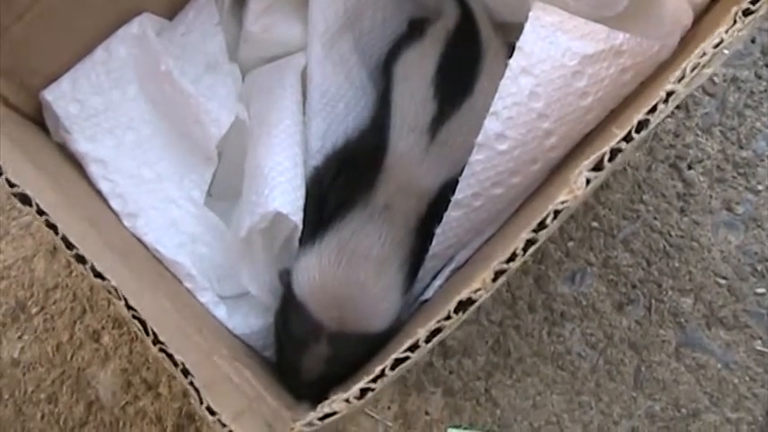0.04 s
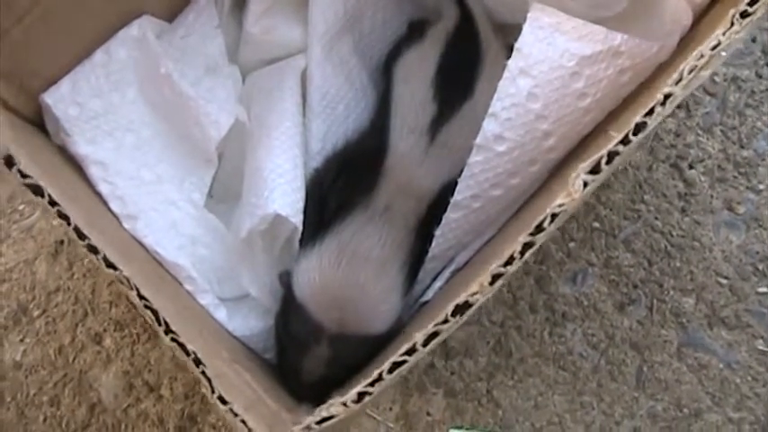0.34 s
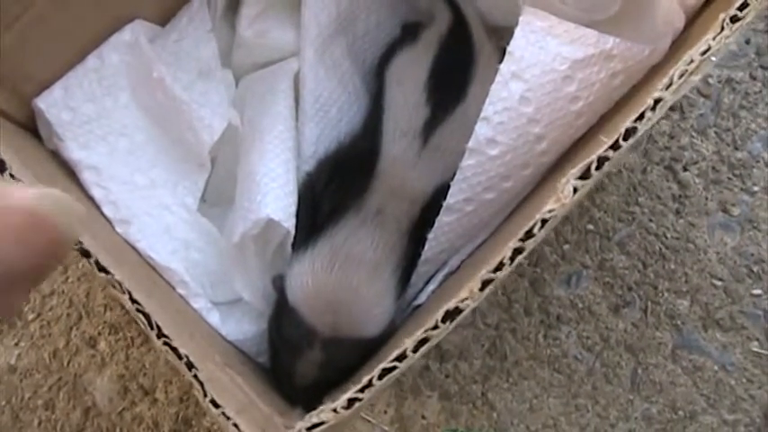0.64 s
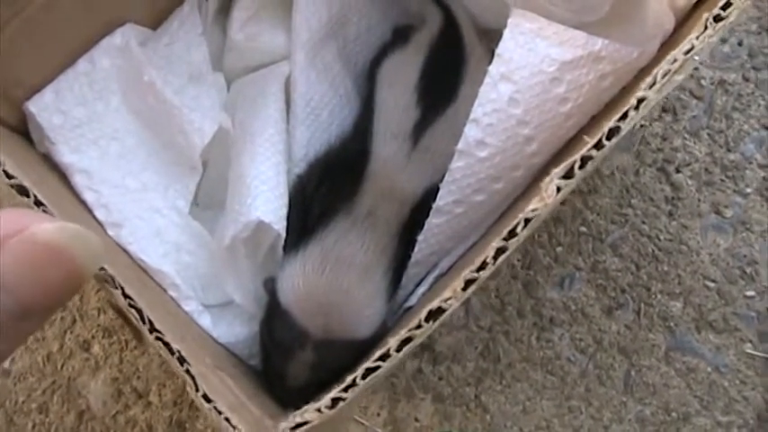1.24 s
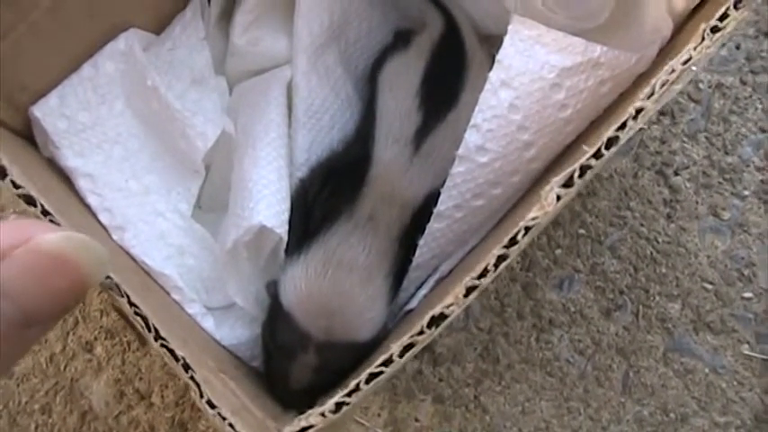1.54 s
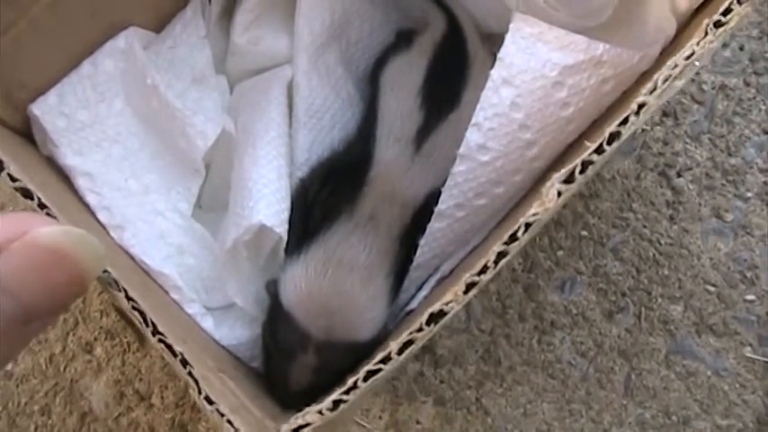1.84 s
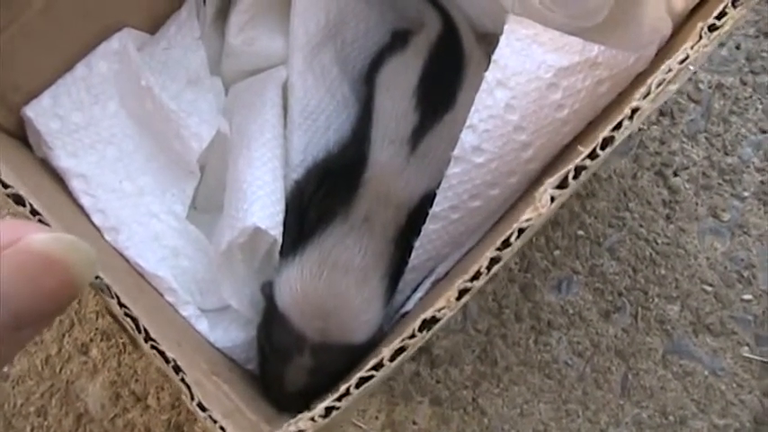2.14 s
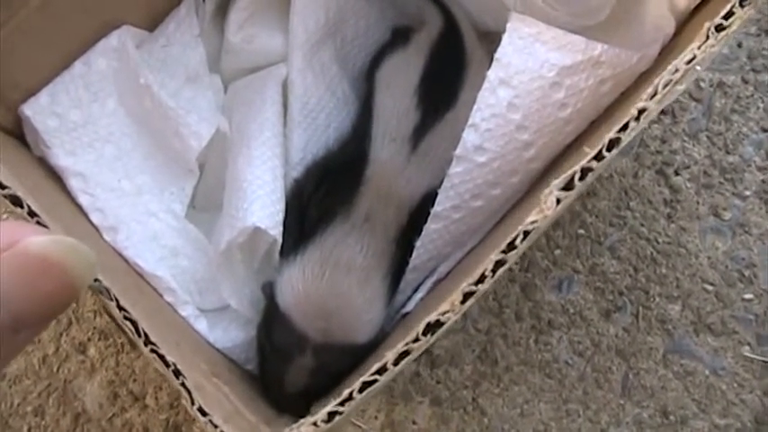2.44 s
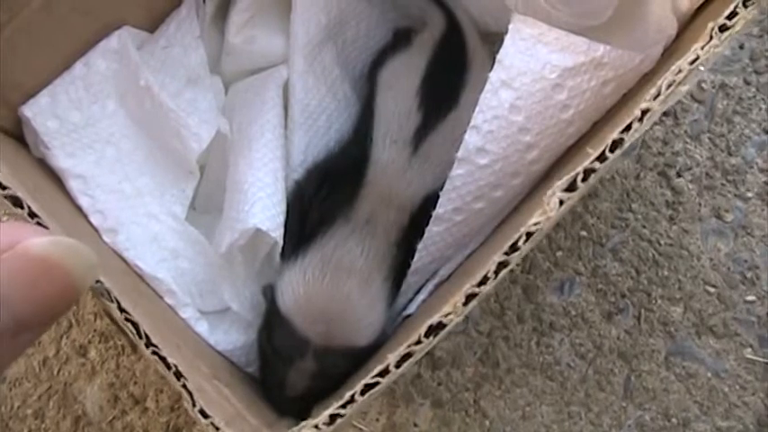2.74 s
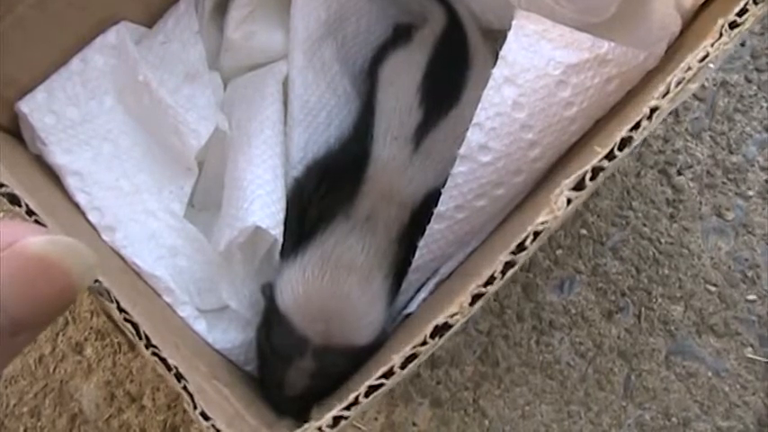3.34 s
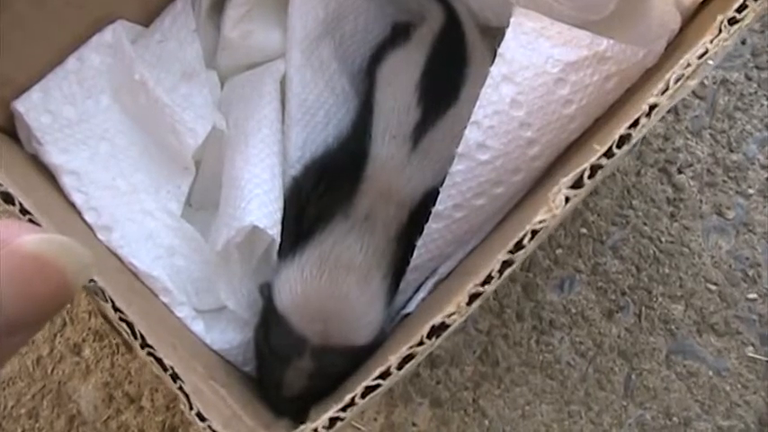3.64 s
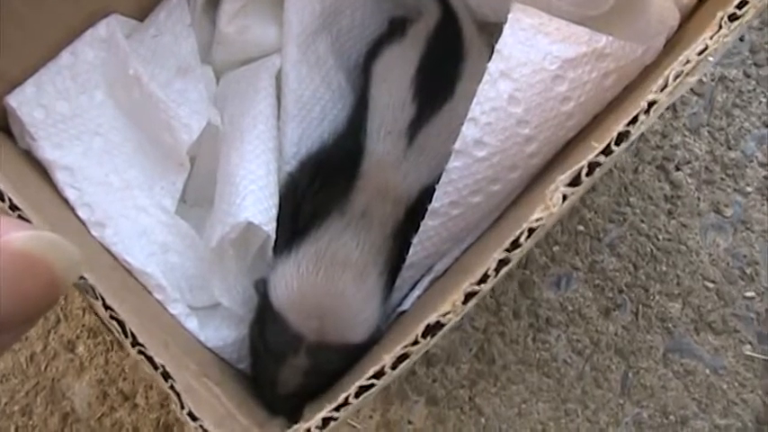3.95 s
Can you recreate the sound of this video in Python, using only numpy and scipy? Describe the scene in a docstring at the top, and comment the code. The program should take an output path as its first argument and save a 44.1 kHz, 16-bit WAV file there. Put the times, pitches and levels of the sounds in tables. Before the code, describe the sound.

A baby skunk chatters twice close to the microphone, rapid clicks swooping into squeaks, the second call ending in a rising squeal. Beforehand a hand softly rubs its cardboard box. Faint high chirps and a machine hum lie behind.

```python
"""A paper-lined cardboard box, microphone close: a hand rubs along it, then a baby skunk inside gives two
chattering calls. Its voice, pulses ringing the throat, swoops about 30 times a second from separate clicks
up to a squeak, and the second call ends in a rising squeal. The cardboard ticks and crunches as it gives.
Some way off something small chirps faintly, very high, and a machine hums in the background."""
import sys
import numpy as np
from scipy import signal
from scipy.fft import rfft, irfft
from scipy.io import wavfile
from scipy.ndimage import uniform_filter1d

SR = 44100
rng = np.random.default_rng(int(sys.argv[2]) if len(sys.argv) > 2 else 0)


def materialize(psi):
    """Save the field psi as 16-bit PCM at rate SR to the path in sys.argv[1].

    A 1-D psi becomes a single channel; in a 2-D psi each row is a channel.
    """
    bounded = np.clip(np.atleast_2d(psi).T, -1, 1)
    quanta = np.round(bounded * 32767).astype(np.int16)
    wavfile.write(sys.argv[1], SR, quanta)


N = 176400


def skunk(first_call_s=1.742, second_call_s=2.849):
    """Close up, vocal pulses and rasp ring the throat: an uneven growl when slow, smooth when fast."""
    # treble lift of the rasp (frequency [Hz], gain [dB])
    rasp_tilt = [(1200, -6), (4500, 11)]
    voice_db, rasp_db, pulse_db_per_octave = -23.5, -29.5, 2.5
    growl_hz, growl_fade_s, growl_start_db, growl_end_db = 947, 0.12, -3, -6.5
    jitter, shimmer_db, rough_growth = .0035, .9, 8
    t = clock()
    pitch, db = voice_contour()
    growl = 1 / (1 + (pitch / growl_hz) ** 4)
    age = t - np.where(t < second_call_s - .5, first_call_s, second_call_s)
    pitch = pitch * (age > 0)
    fresh = np.exp(-(age / growl_fade_s) ** 4)  # the low growl weakens into each call
    db = db + growl * (growl_end_db + (growl_start_db - growl_end_db) * fresh)
    rough = 1 + rough_growth * (2 * growl + .5 * fresh)
    cycles = np.cumsum(pitch * np.exp(jitter * rough * walk(940))) / SR
    times = np.interp(np.arange(1, int(cycles[-1])), cycles, t)  # one pulse a cycle
    octaves = np.log2(np.maximum(pitch, growl_hz / 2) / growl_hz)
    shimmer = shimmer_db * np.sqrt(rough) * walk(550)
    size = undb(voice_db + db + pulse_db_per_octave * octaves + shimmer)
    folds = pulses(times, np.interp(times, t, size))
    rasp_size = undb(rasp_db) * size * np.sqrt(pitch / SR) * (rough + 1)
    rasp = colour(rasp_size * rng.standard_normal(N), rasp_tilt)
    return throat(folds, rasp, growl * fresh, pitch) + voice_clicks()


def voice_contour(creak_hz=327.3, creak_reach=1.7, top_flatness=2.3):
    """Pitch and level: each swoop arches out of a slow creak, and a squeal closes the second call."""
    # swoops of the voice (time of top [s], top pitch [Hz], rise [s], fall [s], relative level [dB])
    swoops = [(1.7548, 1578, 0.0085, 0.0068, -4.5), (1.785, 1252, 0.007, 0.0074, -5.5),
              (1.816, 1637, 0.0084, 0.0075, -5), (1.847, 1589, .011, .016, -3.5),
              (1.876, 1790, .029, 0.02, -4), (1.908, 1732, 0.017, 0.012, -3.5),
              (1.941, 1681, 0.022, .012, -5.5), (1.975, 1620, 0.016, 0.01, -3),
              (2.005, 1554, 0.030, 0.012, -5.5), (2.043, 1362, 0.022, 0.011, -6.5),
              (2.852, 2080, .006, 0.0087, -2), (2.8815, 1875, 0.010, 0.0091, -3),
              (2.912, 1694, .008, .010, -4.5), (2.943, 1600, .013, 0.015, -5),
              (2.957, 789, .012, .012, -0.5), (2.977, 1828, .021, 0.018, -3.5),
              (3.008, 2007, 0.016, 0.021, -2), (3.037, 2048, 0.03, 0.014, -1.5),
              (3.068, 1779, .022, .016, -2.5)]
    # closing squeal (time [s], pitch [Hz], relative level [dB])
    squeal_path = [(3.084, 499, -2), (3.093, 1433, -2.5), (3.100, 1683, -5), (3.110, 1910, -0.5),
                   (3.124, 2140, 1), (3.137, 2260, -2.5), (3.148, 2310, 0.5), (3.162, 2330, -12)]
    t, arches = clock(), []
    for at, hz, rise, fall, _ in swoops:
        away = np.abs(t - at) / np.where(t < at, rise, fall)
        arches.append(np.maximum(hz * (1 - away ** top_flatness), creak_hz * (away < creak_reach)))
    weight = np.array(arches) ** 6  # soft maximum: overlapping swoops merge
    pitch = weight.sum(axis=0) ** (1 / 6)
    db = np.array(swoops)[:, 4] @ weight / (weight.sum(axis=0) + 1)
    at, hz, squeal_db = np.array(squeal_path).T
    squeal = np.interp(t, at, hz, left=0, right=0)
    return np.maximum(pitch, squeal), np.where(squeal > pitch, np.interp(t, at, squeal_db), db)


def throat(folds, rasp, growl, pitch, pure_hz=2200, grunt_hz=760, grunt_q=4, grunt_db=12):
    """Throat and mouth resonate; slow pulses add a grunt, the fastest round off towards a pure tone."""
    # resonances of throat and mouth (frequency [Hz], gain [dB])
    resonances = [(250, -19), (520, 10), (760, 11.5), (1020, 1.5), (1450, 4), (1750, -5.5), (2100, 1),
                  (2500, -4), (3000, -4), (3550, -13), (4100, -5), (5000, -20.5), (6500, -16), (8200, -19),
                  (9600, -31), (15500, -48)]
    pure = 1 / (1 + (pure_hz / np.maximum(pitch, 1)) ** 20)
    rounded = signal.lfilter(*signal.butter(2, 2.76 * pure_hz, fs=SR), pure * folds)
    grunt = signal.lfilter(*signal.iirpeak(grunt_hz, grunt_q, fs=SR), growl * folds)
    return colour((1 - pure) * folds + rounded + rasp, resonances) + undb(grunt_db) * grunt


def voice_clicks(gain_db=-23.5, rebound_s=.00055, rebound_share=.6):
    """The voice catches as some swoops start: a hard click and a weaker, opposite rebound."""
    # catches of the voice (time [s], relative level [dB])
    catches = [(1.7425, -1), (1.771, -5), (1.7763, -1.5), (1.8035, 0.5), (1.8095, -7), (1.836, -1.5),
               (1.959, -9), (2.8493, 0.5), (2.8672, 0.5), (2.9026, 2), (2.9309, 1), (2.9333, -2)]
    # colour of a click (frequency [Hz], gain [dB])
    click_colour = [(200, -29), (650, 20), (1300, -19), (3000, 1.5), (5000, -5.5), (7500, -1.5),
                    (11000, -19), (15500, -24)]
    at, db = np.array(catches).T
    snap = undb(gain_db + db)
    return colour(pulses(at + rebound_s, rebound_share * snap) - pulses(at, snap), click_colour)


def squeal_tail(at=3.21, width=0.073, db=-66, band_hz=(2300, 5500)):
    """As the squeal ends it splits into thin whistles and trails off in an airy hiss."""
    # whistles (time of peak [s], width [s], pitch [Hz], glide [Hz/s], level [dB])
    whistles = [(3.150, 0.013, 5380, 9000, -62), (3.168, .015, 3980, 29700, -59)]
    band = signal.butter(4, band_hz, "bandpass", fs=SR, output="sos")
    air = unit(signal.sosfilt(band, rng.standard_normal(N)))
    return sum(squeak(*row) for row in whistles) + undb(db) * swell(at, width) * air


def rubbing(side_db=-2, grain_db=1.8, paper_t60_s=.06, paper_hz=11900, paper_q=25):
    """Skin slides on cardboard near the microphone: fine hiss and a papery ring over the hollow box."""
    # strokes of the hand (time of peak [s], rise [s], fall [s], body level [dB], hiss level [dB])
    strokes = [(.005, 0.021, 0.077, -49.5, -59.5), (0.14, 0.028, 0.041, -52.5, -59.5),
               (.203, 0.024, 0.033, -54.5, -57.5), (.352, 0.023, 0.063, -58.5, -64),
               (.57, 0.12, 0.13, -56.5, -58.5), (.65, 0.028, 0.06, -58, -52)]
    # hollow body of the box (frequency [Hz], relative level [dB])
    body_colour = [(90, -8.5), (220, -2.5), (420, -9.5), (660, 5), (900, -8), (1600, -9.5), (2200, -23),
                   (15000, -30.5)]
    # hiss of sliding skin (frequency [Hz], relative level [dB])
    hiss_colour = [(500, -1), (2000, -27), (2700, -9.5), (6500, -8), (8300, -5), (12800, -12), (15500, -11)]
    t, body, hiss = clock(), 0, 0
    for at, rise, fall, body_db, hiss_db in strokes:
        stroke = swell(at, np.where(t < at, rise, fall))
        body += undb(body_db) * stroke
        hiss += undb(hiss_db) * stroke
    grain = unit(undb(grain_db * walk(350)))
    mid, side = (grain * (body * noise(body_colour) + hiss * smear(noise(hiss_colour), paper_t60_s))
                 for _ in range(2))
    rub = stereo(mid, undb(side_db) * side)
    paper_ring = signal.lfilter(*signal.iirpeak(paper_hz, paper_q, fs=SR), rub)
    return rub + paper_ring


def ticks(crackle_db=-3, crackle_t60_s=0.019):
    """Cardboard and paper give way with a snap and a small hollow knock."""
    # ticks (time [s], relative snap level [dB], relative knock level [dB])
    tick_events = [(.168, -25, -46), (0.1968, -25, -47), (0.2798, -25, -27), (.309, -33, -50),
                   (2.2375, -31, -45), (3.3978, -24, -24), (3.567, -30, -45)]
    # colour of the snap (frequency [Hz], gain [dB])
    snap_colour = [(300, -24), (1500, 0), (2800, -2), (4500, -4.5), (8000, -4.5), (11000, -17),
                   (15500, -31)]
    # colour of the box's knock (frequency [Hz], gain [dB])
    knock_colour = [(150, 1), (450, 13), (680, 20), (950, -8), (8000, -42)]
    at, snap_db, knock_db = np.array(tick_events).T
    snap = pulses(at, undb(snap_db))
    crackle = undb(crackle_db) * smear(snap, crackle_t60_s)
    return colour(snap + crackle, snap_colour) + colour(pulses(at, undb(knock_db)), knock_colour)


def crunches(grain_db=3.5):
    """Pressed cardboard gives way in dense, uneven cracks; a finger sticks and squeaks once."""
    # presses of the fingers (time [s], width [s], level [dB])
    presses = [(.004, 0.0098, -44.5), (.136, .019, -44.5), (.278, 0.005, -57)]
    # low thud and crackle of the cardboard's flutes (frequency [Hz], relative level [dB])
    crunch_colour = [(70, -13), (150, 7), (240, 10.5), (400, -1), (1400, -7), (2200, -15), (2700, -6),
                     (4400, -13), (5400, -14), (12000, -25)]
    press = sum(undb(db) * swell(at, width) for at, width, db in presses)
    cracks = unit(colour(rng.standard_normal(N) * undb(grain_db * walk(1500)), crunch_colour))
    return press * cracks + squeak(at=.613, width=0.0037, hz=2750, glide=0, db=-50.5)


def bumps():
    """Low rumble of handling, unrelated left and right."""
    # handling bumps (time [s], width [s], level [dB])
    pushes = [(.245, 0.031, -44.5), (.68, 0.24, -55)]
    # colour of the rumble (frequency [Hz], relative level [dB])
    rumble_colour = [(20, -5), (55, 3), (100, -8.5), (1000, -83)]
    push = sum(undb(db) * swell(at, width) for at, width, db in pushes)
    return push * np.array([noise(rumble_colour) for _ in range(2)])


def in_box(x, box_t60_s=.014, box_db=-9, room_t60_s=.25, room_db=-17):
    """Quick reflections from the box walls widen the sound; the surroundings add a faint tail."""
    tail = np.array([smear(x, room_t60_s) for _ in range(2)])
    return stereo(x, undb(box_db) * smear(x, box_t60_s)) + undb(room_db) * tail


def chirps(centre_hz=8080, width_s=0.0089, fall_hz_per_s=12000, level_db=-62):
    """Tiny falling, scratchy chirps some way from the microphone, no two alike."""
    # peaks of the chirps (time [s])
    chirp_times = [.76, 1.094, 1.17, 1.212, 1.225, 1.259, 1.272, 1.322, 1.496, 1.549, 2.142, 2.195, 2.248,
                   2.314, 2.362, 2.41, 3.338, 3.384, 3.423, 3.433, 3.475, 3.64]
    scatter_hz, scatter_db, wobble_hz, scratch_db = 110, 2, 170, 4
    echo_db, echo_t60_s = -7, 0.33
    t, out = clock(), np.zeros(N)
    wobble = wobble_hz * walk(1030)
    for at, (high, loud) in zip(chirp_times, rng.standard_normal((len(chirp_times), 2))):
        near = np.abs(t - at) < 1 / 20
        age = t[near] - at
        hz = centre_hz + scatter_hz * high - fall_hz_per_s * age + wobble[near]
        envelope = undb(level_db + scatter_db * loud) * np.exp(-(age / width_s) ** 2)
        out[near] += envelope * np.sin(2 * np.pi * np.cumsum(hz) / SR)
    out *= unit(undb(scratch_db * walk(860)))
    return np.array([out + undb(echo_db) * smear(out, echo_t60_s) for _ in range(2)])


def room_tone(mid_db=-54.5, side_db=-54.5):
    """Steady air noise all round the microphone."""
    # air common to both channels (frequency [Hz], relative level [dB])
    air_mid = [(25, -20), (55, -24), (110, -7.5), (190, -11.5), (310, -5.5), (420, -10.5), (480, -16),
               (800, -17.5), (1400, -23), (2200, -27.5), (7500, -36), (15500, -47.5)]
    # air differing between the channels (frequency [Hz], relative level [dB])
    air_side = [(25, -3.5), (170, 0.5), (300, -0.5), (480, -3), (1400, -10), (2400, -14), (8000, -24.5),
                (15500, -37)]
    return stereo(undb(mid_db) * noise(air_mid), undb(side_db) * noise(air_side))


def machine_hum(drift_hz=0.44, waver_db=1.0, side_db=-16.5):
    """A machine runs in the background, its tones wavering slightly in pitch and level."""
    # tones of the hum (frequency [Hz], level [dB])
    tones = [(56, -70.5), (117.4, -66), (120, -67.5), (239.5, -64.5), (352.3, -60), (411.1, -54),
             (1350, -76), (1468, -75)]
    mid, side = 0, 0
    for hz, db in tones:
        phase = 2 * np.pi * (np.cumsum(hz + drift_hz * walk(3.6)) / SR + rng.random())
        size = np.sqrt(2) * undb(db + waver_db * walk(31))
        mid += size * np.sin(phase)
        side += undb(side_db) * size * np.cos(phase)
    return stereo(mid, side)


def undb(db):
    """Decibels to gain."""
    return 10 ** (np.asarray(db) / 20)


def unit(x):
    """Scale to rms 1."""
    return x / np.sqrt(np.mean(x ** 2))


def clock():
    """Time of every sample."""
    return np.arange(N) / SR


def swell(at, width):
    """Bell-shaped envelope."""
    return np.exp(-((clock() - at) / width) ** 2)


def walk(rate):
    """Smooth chance, changing rate times a second."""
    k = max(int(SR / rate), 1)
    return unit(uniform_filter1d(uniform_filter1d(rng.standard_normal(N), k, mode="wrap"), k, mode="wrap"))


def squeak(at, width, hz, glide, db, waver=.012):
    """A short, unsteady gliding tone."""
    phase = np.cumsum((hz + glide * (clock() - at)) * (1 + waver * walk(900))) / SR
    return undb(db) * swell(at, width) * np.sin(2 * np.pi * phase)


def colour(x, points):
    """Causal filter through (Hz, dB) points."""
    hz, db = np.array(points, float).T
    f = np.maximum(np.arange(N // 2 + 1) * SR / N, 1)
    cep = irfft(np.log(undb(np.interp(np.log(f), np.log(hz), db))), N)
    cep[1:N // 2] *= 2
    cep[N // 2 + 1:] = 0
    return signal.fftconvolve(x, irfft(np.exp(rfft(cep)), N)[:SR // 10])[:N]


def noise(points):
    """Coloured noise of rms 1."""
    return unit(colour(rng.standard_normal(N), points))


def pulses(times, sizes):
    """Sharp pulses placed between samples."""
    out, at = np.zeros(N), np.asarray(times) * SR
    taps = at.astype(int)[:, None] + np.arange(-7, 9)
    d = taps - at[:, None]
    np.add.at(out, np.clip(taps, 0, N - 1), sizes[:, None] * np.sinc(d) * np.cos(np.pi * d / 16) ** 2)
    return out


def smear(x, t60):
    """Dense reflections that die away, with the same energy as the input."""
    t = clock()[:SR // 2]
    tail = rng.standard_normal(len(t)) * np.exp(-np.log(1000) * t / max(t60, 1 / SR))
    return signal.fftconvolve(x, tail / np.linalg.norm(tail))[:N]


def stereo(mid, side):
    """Left and right from their common and differing parts."""
    return np.array([mid + side, mid - side])


def scene():
    """Skunk and box close to the microphone; chirps, air and hum behind."""
    close = in_box(skunk() + squeal_tail() + ticks() + crunches()) + rubbing() + bumps()
    return close + chirps() + room_tone() + machine_hum()


def record(dry, top_hz=15700):
    """The recorder cuts the top treble steeply."""
    return signal.sosfilt(signal.ellip(10, .2, 70, top_hz, fs=SR, output="sos"), dry)


dry = scene()
out = record(dry)
materialize(out)
```